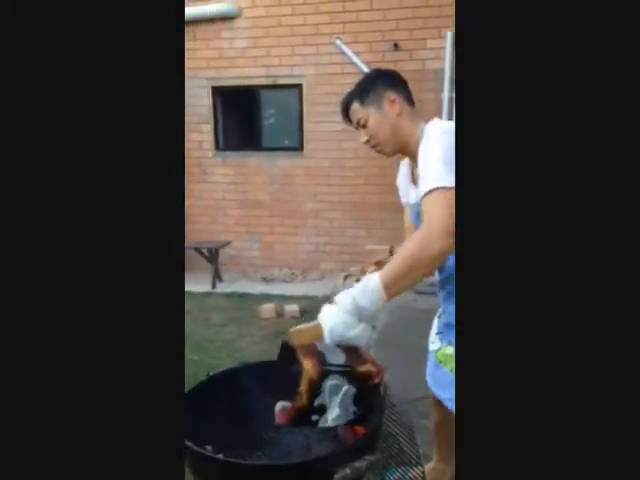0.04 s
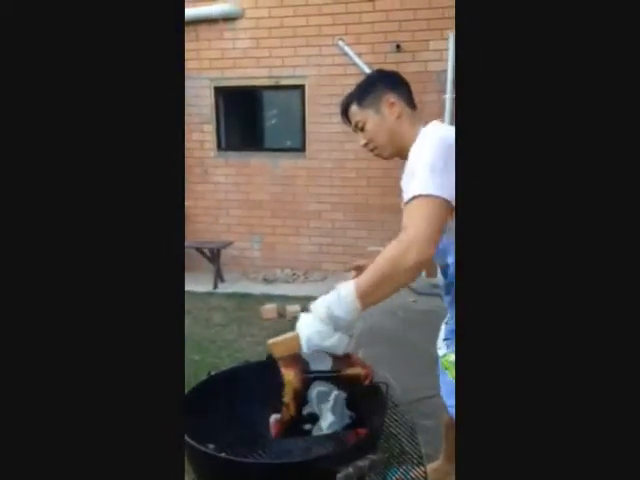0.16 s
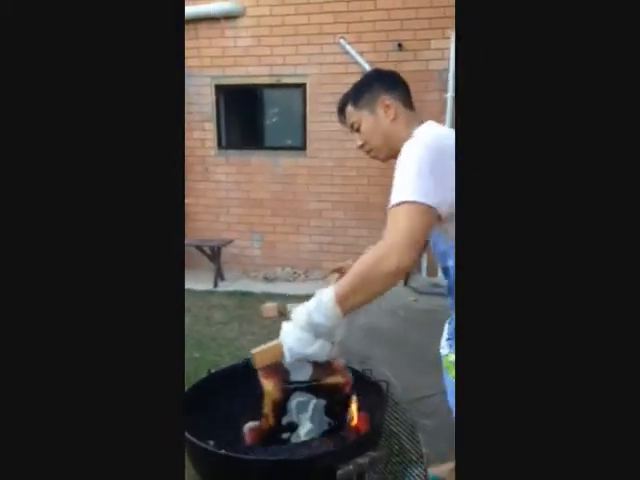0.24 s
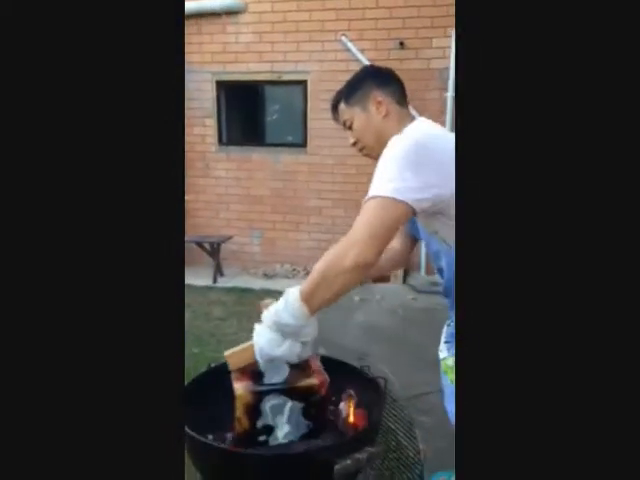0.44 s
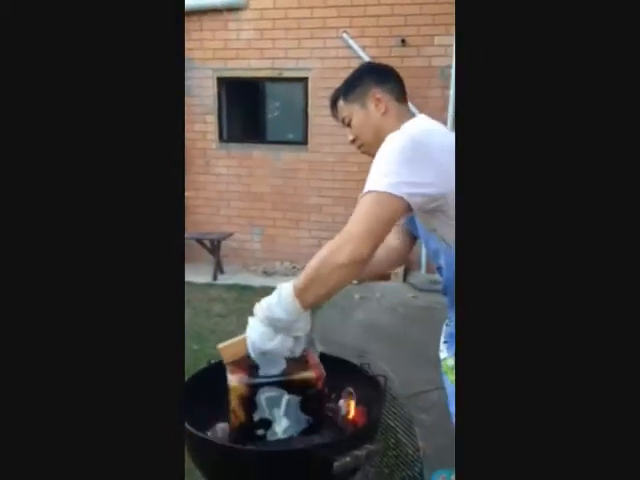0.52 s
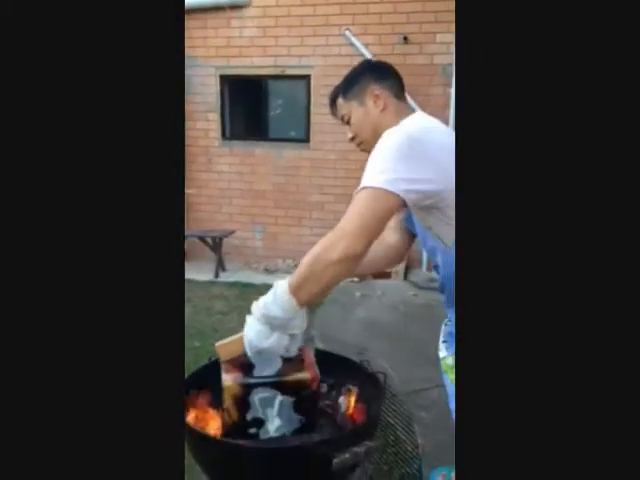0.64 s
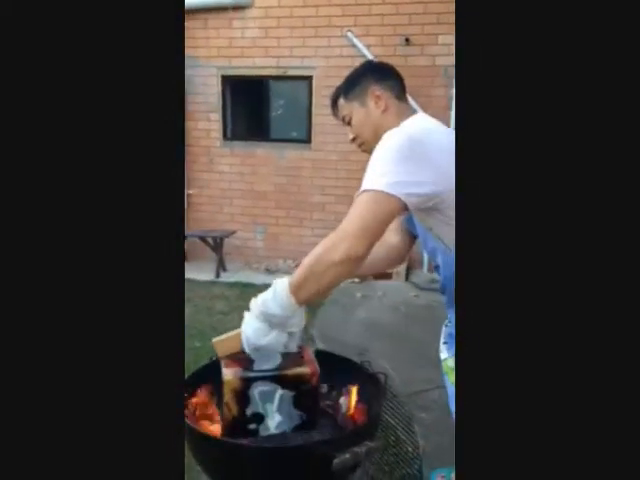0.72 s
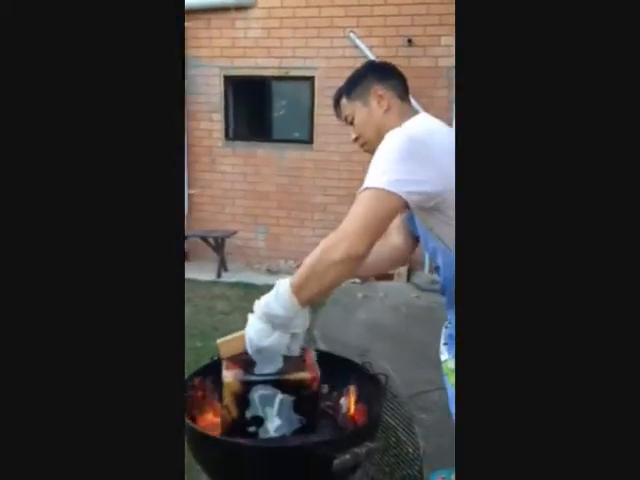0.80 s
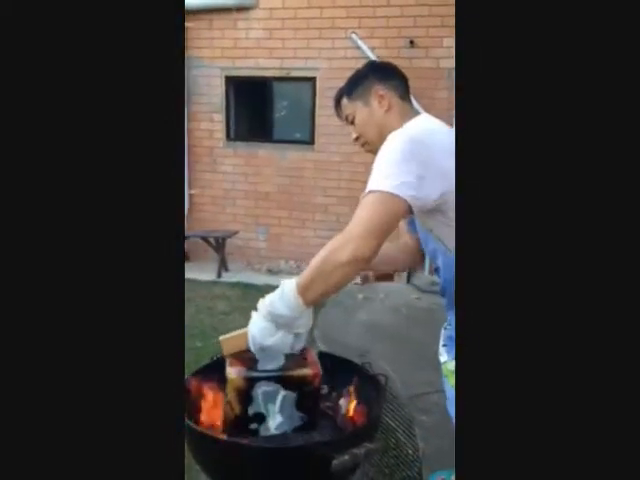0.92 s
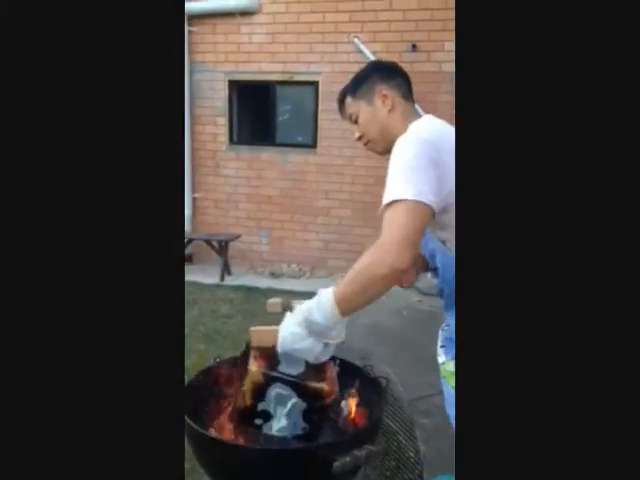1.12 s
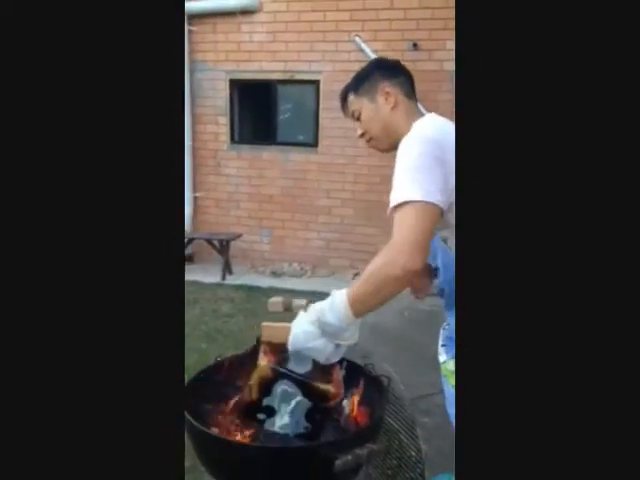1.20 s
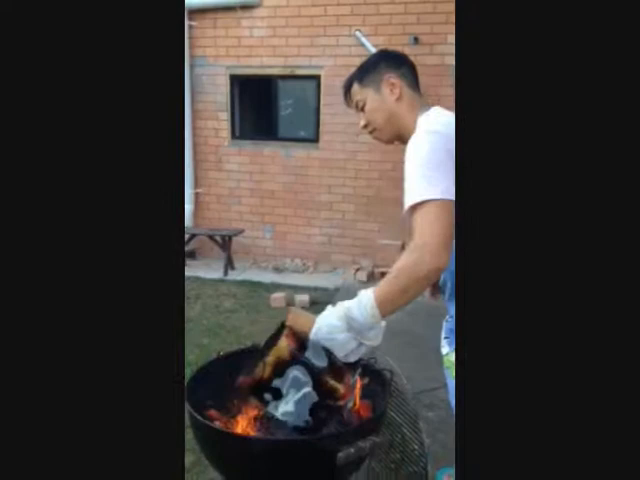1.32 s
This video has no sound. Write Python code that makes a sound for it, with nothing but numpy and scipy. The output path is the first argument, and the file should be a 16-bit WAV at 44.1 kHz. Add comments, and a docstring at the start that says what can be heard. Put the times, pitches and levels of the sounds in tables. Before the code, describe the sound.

A tool scraping through charcoal in a steel grill, five gritty strokes with short squeaks.

```python
"""A hand tool is shoved five times through charcoal in a steel kettle grill in a backyard.
The lumps grate and crack; their tiny fractures ring the tool and the hollow bowl.
The tool's edge sticks and slips in short squeaks, and fine ash hisses as it digs in.
A brick wall answers. Moving air buffets the microphone, mostly at first, with a soft bump."""
import sys
import numpy as np
from scipy import signal
from scipy.fft import rfft, irfft, next_fast_len
from scipy.io import wavfile
from scipy.ndimage import uniform_filter1d, map_coordinates

SR = 44100
rng = np.random.default_rng(int(sys.argv[2]) if len(sys.argv) > 2 else 0)


def generate_wav(signal):
    """Clip the signal to [-1, 1] and save it as 16-bit WAV at the path in sys.argv[1]."""
    frames = np.transpose(np.atleast_2d(signal))
    scaled = np.clip(frames, -1, 1) * 32767
    pcm = np.round(scaled).astype(np.int16)
    wavfile.write(sys.argv[1], SR, pcm)


N = 59535
TOP_HZ = 10850


def amp(db):
    """Decibels to gain."""
    return 10 ** (np.asarray(db) / 20)


def unit(x):
    """Scale to rms 1."""
    return x / np.sqrt(np.mean(x ** 2) + 1e-20)


def even(x, window_samples):
    """Hold the running rms at 1."""
    return x / np.sqrt(np.abs(uniform_filter1d(x ** 2, size=window_samples)) + 1e-12)


def clock():
    """Sample times [s]."""
    return np.arange(N) / SR


def wobble(knots_per_s):
    """Smooth random curve."""
    return map_coordinates(rng.standard_normal(N // 100), [clock() * knots_per_s], mode="wrap")


def swell(peak_s, rise_s, fall_s):
    """Peak, 20 dB down one rise before and one fall after."""
    t = clock() - peak_s
    return 10 ** np.minimum(t / rise_s, -t / fall_s)


def held(start_s, hold_s, rise_s, fall_s):
    """Linear rise, hold, then 20 dB lost per fall."""
    t = clock() - start_s
    return np.clip(t / rise_s, 0, 1) * 10 ** (-np.maximum(t - hold_s, 0) / fall_s)


def filtered(x, response):
    """Apply a complex frequency response."""
    size = next_fast_len(N + SR // 2)
    return irfft(rfft(x, size) * response(np.fft.rfftfreq(size, 1 / SR)), size)[:N]


def shaped(x, response):
    """Filter that keeps the power of white noise."""
    return filtered(x, lambda hz: response(hz) / np.sqrt(np.mean(np.abs(response(hz)) ** 2)))


def colour(x, spectrum):
    """Shape x by (frequency [Hz], level [dB]) points on a log axis, up to TOP_HZ."""
    knots_hz, db = np.transpose(spectrum)
    return shaped(x, lambda hz: amp(np.interp(np.log(hz + 1), np.log(knots_hz), db)) * (hz < TOP_HZ))


def ring(x, modes):
    """Pass x through resonances (frequency [Hz], width [Hz], level [dB])."""
    return shaped(x, lambda hz: sum(amp(db) * 1j * hz * width / (centre ** 2 - hz ** 2 + 1j * hz * width)
                                    for centre, width, db in modes))


def air(yard_db=-55.5):
    """Quiet yard, and draughts that rumble on the microphone."""
    # (time [s], level [dB])
    draughts = [
        [(0.0, -42), (0.028, -62), (0.054, -38), (0.102, -57.5), (0.138, -36.5), (0.174, -59), (0.2, -34.5),
         (0.214, -37), (0.236, -47), (0.268, -35), (0.288, -49), (0.364, -42.5), (0.39, -83)],
        [(0.39, -69), (0.426, -45), (0.462, -70), (0.57, -81), (0.608, -54), (0.676, -52), (0.702, -67),
         (0.812, -43), (0.93, -63), (1.05, -55), (1.292, -56), (1.308, -72), (1.35, -52)],
    ]
    # (frequency [Hz], level [dB])
    buffet_spectrum = [(20, -28), (40, -13), (62, 0.5), (100, -3.5), (150, -9), (230, -31), (500, -57),
                       (1500, -86)]
    yard_spectrum = [(15, -29), (25, -2), (74, -2), (209, -6), (424, -9), (797, -5.5), (1580, -12.5),
                     (3540, -18), (3820, -20.5), (9490, -23.5), (10500, -31), (13600, -76), (22000, -120)]
    times_s, db = np.vstack(draughts).T
    rumble = even(colour(rng.standard_normal(N), buffet_spectrum), 1400)
    yard = unit(colour(rng.standard_normal(N), yard_spectrum))
    return amp(np.interp(clock(), times_s, db)) * rumble + amp(yard_db) * yard


def bumps(width_s=.001, rebound_ratio=3, flutter_db=-14):
    """Soft pushes of air on the microphone, each with a short low flutter."""
    # (time [s], level [dB])
    pushes = [(0.163, -39.5), (0.207, -20.5)]
    # (frequency [Hz], level [dB])
    flutter_spectrum = [(40, -15), (150, -10), (280, -12), (450, -17.5), (800, -39), (1500, -90)]
    out = np.zeros(N)
    for at_s, db in pushes:
        widths = (clock() - at_s) / width_s
        push = np.exp(-widths ** 2) - np.exp(-(widths / rebound_ratio) ** 2) / rebound_ratio
        flutter = even(colour(rng.standard_normal(N), flutter_spectrum), 500)
        out += amp(db) * (push + amp(flutter_db) * swell(at_s - .002, .01, .008) * flutter)
    return out


def wall(x, delay_s=.008, t60_s=0.32, level_db=-15):
    """Short diffuse reflection off the brick wall."""
    t = np.arange(SR // 2) / SR
    tail = rng.standard_normal(len(t)) * amp(-60 * t / t60_s) * (t > delay_s)
    return amp(level_db) * signal.fftconvolve(x, tail / np.linalg.norm(tail))[:N]


def ash(at_s=0.368, level_db=-45.5):
    """Fine ash spills with a brief hiss as the tool digs in."""
    # (frequency [Hz], level [dB])
    spectrum = [(500, -35), (3500, -6.5), (4600, -2), (5800, -11), (7500, -1), (10500, -11.5)]
    hiss = colour(rng.standard_normal(N), spectrum)
    return amp(level_db) * swell(at_s, rise_s=0.0012, fall_s=0.055) * hiss


def squeaks(slips_per_s=700, scatter=.35):
    """The edge sticks and slips; each squeak drives the resonances near its centre."""
    # (start [s], hold [s], level [dB], centre [Hz], spread [Hz])
    events = [(0.302, 0.021, -56, 3910, 130), (0.589, 0.014, -26, 3570, 750),
              (0.804, 0.0085, -33.5, 4520, 260), (0.808, 0.031, -38, 3030, 118),
              (1.028, 0.0063, -43, 3050, 121), (1.179, 0.022, -55.5, 3080, 99),
              (1.266, 0.038, -52, 3050, 140), (1.299, 0.028, -53, 2280, 96.4),
              (1.343, .012, -42.5, 3050, 162)]
    # (frequency [Hz], width [Hz], level [dB])
    edge_modes = [(2190, 22, 0), (2950, 44, 10), (3220, 71, 5), (3406, 38, 5), (3755, 54, 2.5),
                  (4040, 56, 1), (4200, 160, -4.5), (4600, 76, -18)]
    out = np.zeros(N)
    for start_s, hold_s, db, centre_hz, spread_hz in events:
        slip_count = np.cumsum(slips_per_s * np.exp(scatter * wobble(400))) / SR
        slips = unit(np.diff(np.floor(slip_count), prepend=0))
        edge = ring(slips + rng.standard_normal(N), edge_modes)
        tone = filtered(edge, lambda hz: 1 / (1 + ((hz - centre_hz) / spread_hz) ** 4))
        out += amp(db) * held(start_s, hold_s, rise_s=0.00068, fall_s=0.026) * even(tone, 700)
    return out


def grains(cracks_per_s=3500, spread_db=3.5, rub_share=0.43):
    """Tiny charcoal fractures of uneven size over a smooth rub, rms 1."""
    sizes = amp(spread_db * np.minimum(rng.exponential(size=N), 5)) * rng.choice([-1, 1], N)
    cracks = unit(sizes * (rng.random(N) < cracks_per_s / SR))
    return np.sqrt(1 - rub_share) * cracks + np.sqrt(rub_share) * rng.standard_normal(N)


def hollow(modes, band_hz):
    """One group of bowl modes, kept ringing by the rubbing coals, rms 1."""
    band = signal.butter(3, band_hz, "band", fs=SR, output="sos")
    return even(signal.sosfilt(band, ring(grains(), modes)), 1400)


def bowl(stroke_force, brush_force, belly_force):
    """The steel bowl rings over its deep belly; brushes wake upper modes in place of the middle ones."""
    # (frequency [Hz], width [Hz], level [dB])
    middle_modes = [(508, 15, -7.5), (545.6, 21.4, 3), (620, 86, -8), (762, 40, -3.5), (812, 18, -4.5),
                    (831.3, 21.5, -2.5), (947, 14, -16)]
    upper_modes = [(752, 32, -2.5), (806, 35, -1.5), (873, 30, -6), (922, 22, -4.5)]
    belly_modes = [(221.5, 53, 0.14), (263, 22, 1), (304, 15, -1.2)]
    middle = stroke_force * hollow(middle_modes, band_hz=[456, 931])
    upper = brush_force * hollow(upper_modes, band_hz=[570, 1050])
    belly = belly_force * hollow(belly_modes, band_hz=[186, 325])
    return amp(.5) * (middle + upper) + amp(-.5) * belly


def grating(force, judder_db=2.04, grit_db=1.5, tool_db=-4):
    """Coals judder along the tool: broadband grit plus the tool's ringing."""
    # (frequency [Hz], level [dB])
    grit_spectrum = [(100, -19), (170, -8), (300, -24), (400, -19), (600, 2.5), (900, -4), (1100, -4.5),
                     (1700, 0), (2400, -1), (3300, -1), (4600, -3), (6000, -8.5), (8000, -12.5),
                     (10500, -18.5)]
    drive_spectrum = [(600, -29), (1200, 1), (4600, -4.5), (7000, -0.5)]
    # (frequency [Hz], width [Hz], level [dB])
    tool_modes = [(1202, 27, -2), (1405.5, 12, 4.5), (1594, 41, 0), (1837, 12, -4.5), (2033, 35, 1.5),
                  (2242, 96, -1.5), (2397, 60, 1.5), (2595, 25, -2), (2974, 45, 5), (3410, 25, -10),
                  (3796, 51, -1.5), (3860, 63, 0.5), (4154, 65, -2), (4420, 210, -2)]
    crunch = force * amp(judder_db * wobble(130))
    grit = colour(crunch * grains(), grit_spectrum)
    tool = ring(crunch * colour(grains(), drive_spectrum), tool_modes)
    return amp(grit_db) * grit + amp(tool_db) * tool


def scraping():
    """Five strokes and a few light brushes push the coals against tool and bowl."""
    # per stroke: (time [s], grating [dB], bowl [dB], belly [dB])
    strokes = [
        [(0.385, -62, -76, -62), (0.399, -37, -67, -57), (0.409, -41.5, -38.5, -46.5), (0.427, -41, -44.5, -56),
         (0.449, -33, -33.5, -44), (0.473, -36, -36, -48), (0.505, -48.5, -42.5, -42), (0.535, -49, -43, -68),
         (0.55, -53, -47, -66)],
        [(0.55, -45.5, -33, -49), (0.564, -54, -49.5, -49), (0.58, -38.5, -34.5, -45), (0.602, -39, -48, -36),
         (0.62, -32, -30.5, -45.5), (0.644, -36.5, -30, -35), (0.658, -40, -40.5, -47),
         (0.674, -44, -33, -39.5), (0.73, -54, -52.5, -65)],
        [(0.73, -47.5, -52, -58), (0.746, -51.5, -41.5, -51), (0.774, -50, -43, -49.5),
         (0.788, -38, -44.5, -43), (0.808, -36, -34.5, -41), (0.834, -37.5, -32.5, -45),
         (0.858, -40.5, -36, -42), (0.894, -52.5, -52, -42), (0.912, -56, -66, -56)],
        [(0.912, -58, -67, -50), (0.924, -42.5, -50, -44), (0.938, -40, -35, -47), (0.958, -46.5, -46.5, -56),
         (0.972, -45, -39, -45)],
        [(0.972, -46, -35.5, -56), (0.982, -42, -37.5, -47), (1.0, -41, -38, -62), (1.014, -46.5, -43.5, -43),
         (1.034, -49, -41, -40), (1.06, -53, -44, -59), (1.084, -56, -51, -48), (1.11, -59.5, -50, -66)],
    ]
    # (time [s], 10 dB rise [s], 10 dB fall [s], grating [dB], bowl [dB], belly [dB])
    brushes = [(0.041, 0.05, 0.023, -52, -58.5, -80), (0.283, 0.0071, 0.024, -49, -55, -76),
               (0.316, 0.021, 0.017, -79, -50, -82), (1.134, 0.01, 0.042, -49.5, -46.5, -57.5),
               (1.299, 0.046, 0.14, -58.5, -68, -50.5)]
    times_s, *levels_db = np.vstack(strokes).T
    stroke_grate, stroke_bowl, stroke_belly = (
        amp(np.interp(clock(), times_s, db, left=-120, right=-120)) for db in levels_db)
    brush_grate, brush_bowl, brush_belly = sum(
        amp(db)[:, None] * np.sqrt(swell(at_s, rise_s, fall_s)) for at_s, rise_s, fall_s, *db in brushes)
    return grating(stroke_grate + brush_grate) + bowl(stroke_bowl, brush_bowl, stroke_belly + brush_belly)


def scene():
    """The grill close by, the wall behind it, the air around."""
    grill = scraping() + squeaks() + ash()
    return (grill + wall(grill) + air() + bumps())[None]


def record(dry):
    """Brick-wall low-pass at TOP_HZ."""
    return filtered(dry[0], lambda hz: hz < TOP_HZ)[None]


dry = scene()
out = record(dry)
generate_wav(out)
```